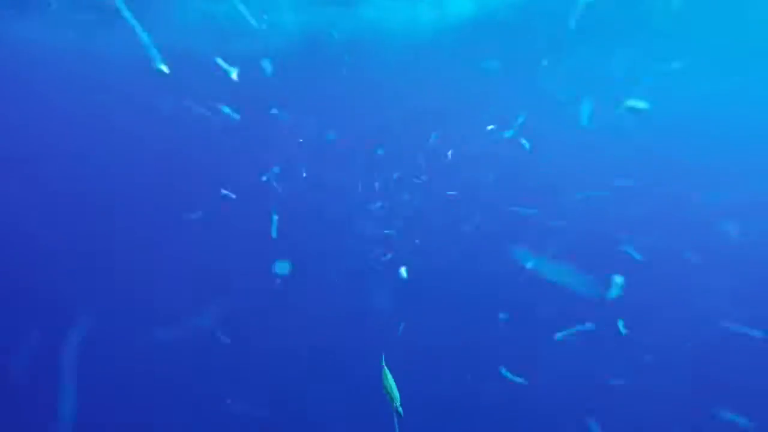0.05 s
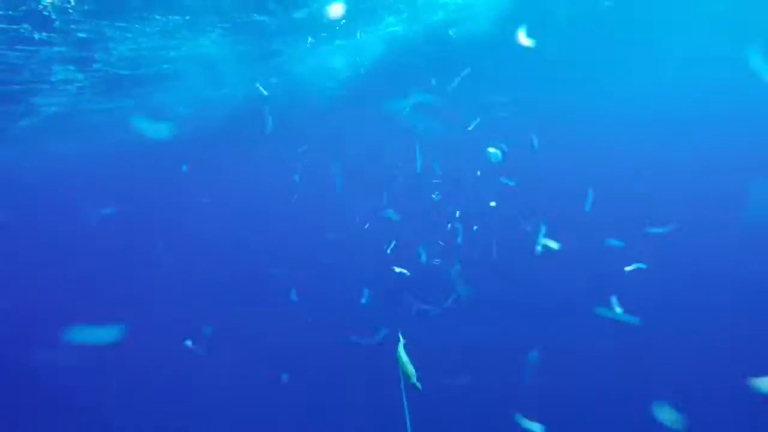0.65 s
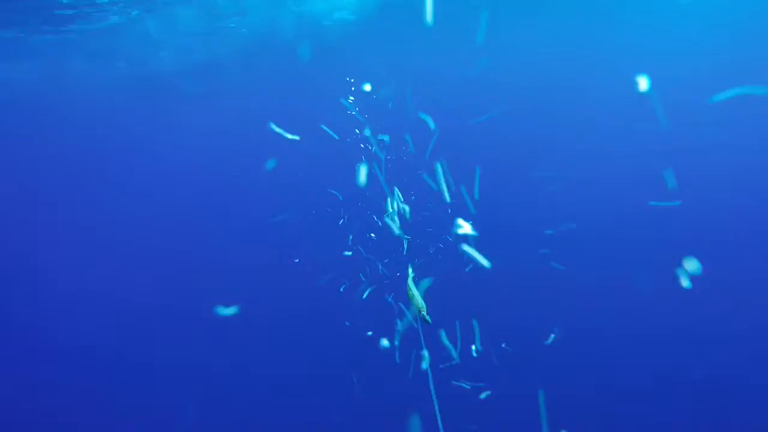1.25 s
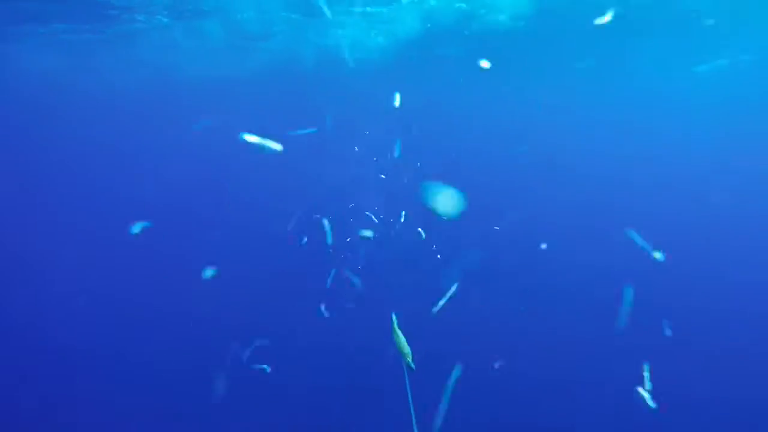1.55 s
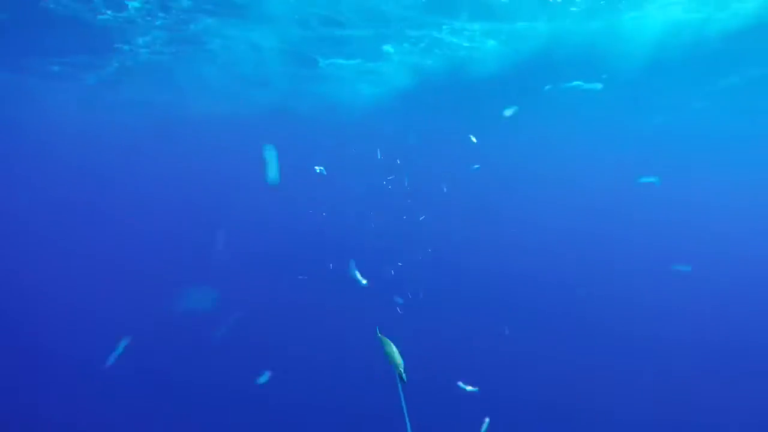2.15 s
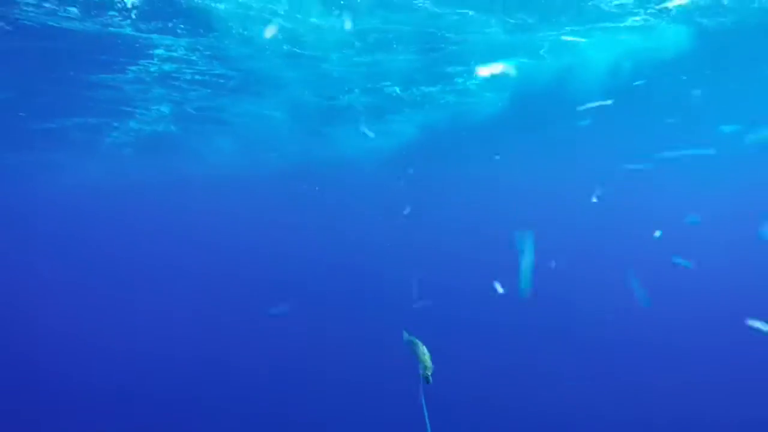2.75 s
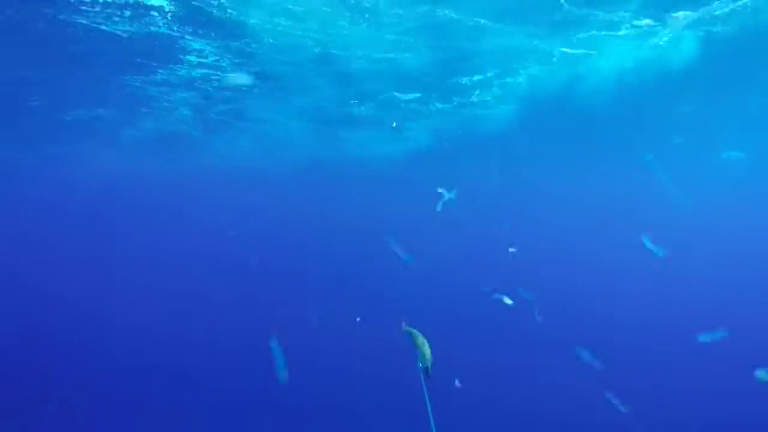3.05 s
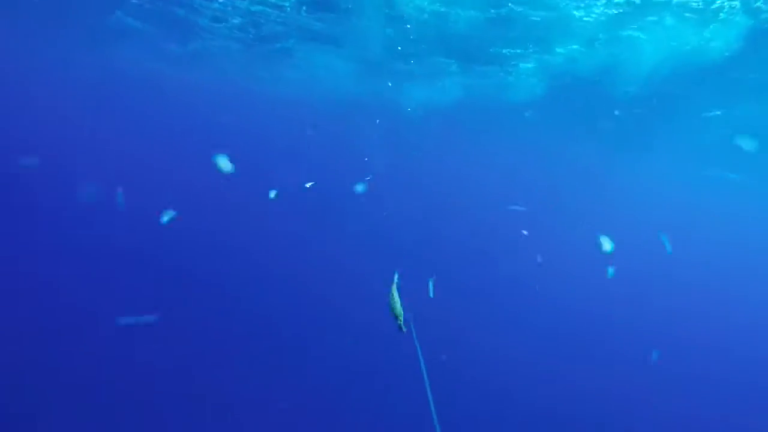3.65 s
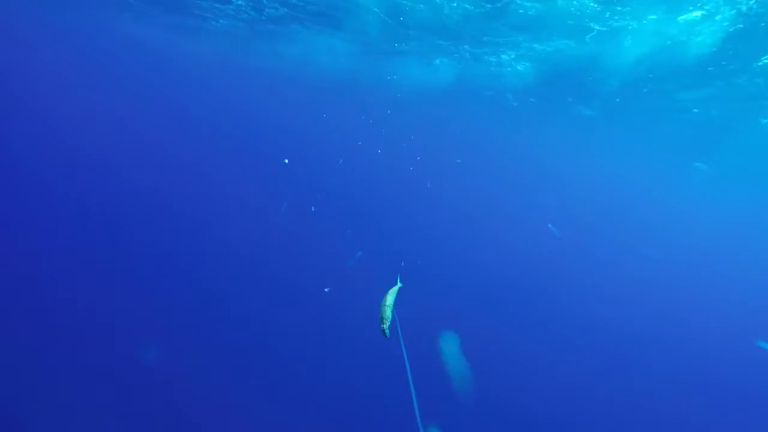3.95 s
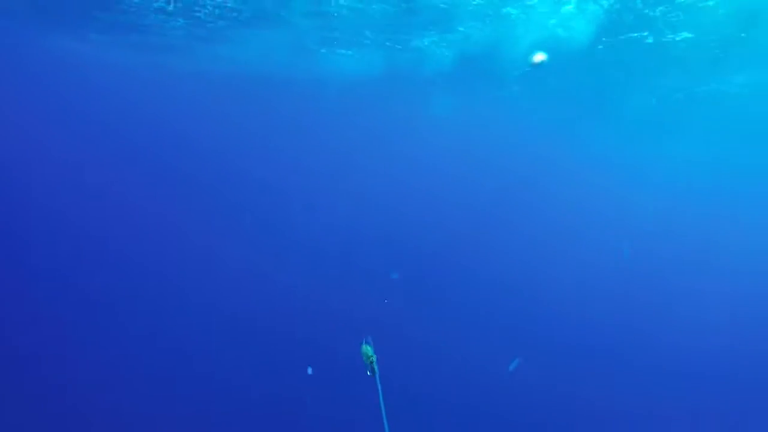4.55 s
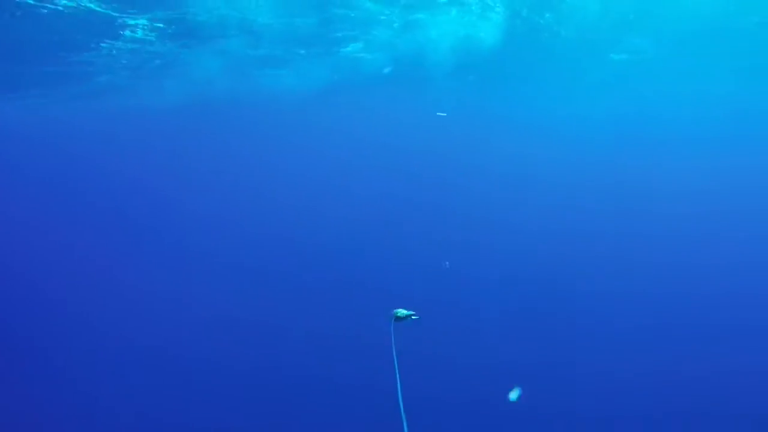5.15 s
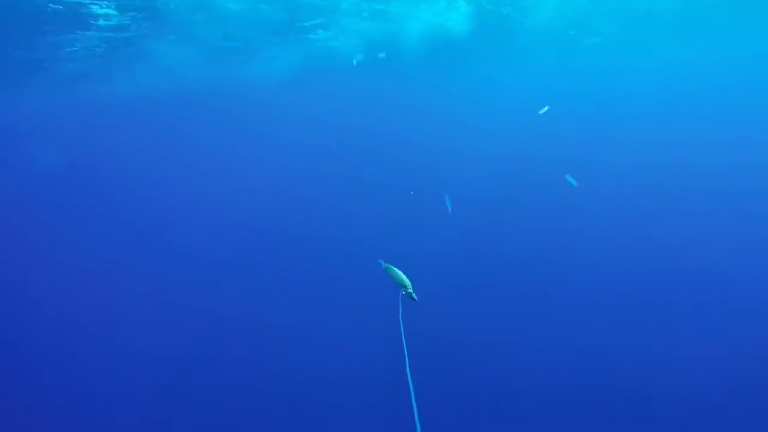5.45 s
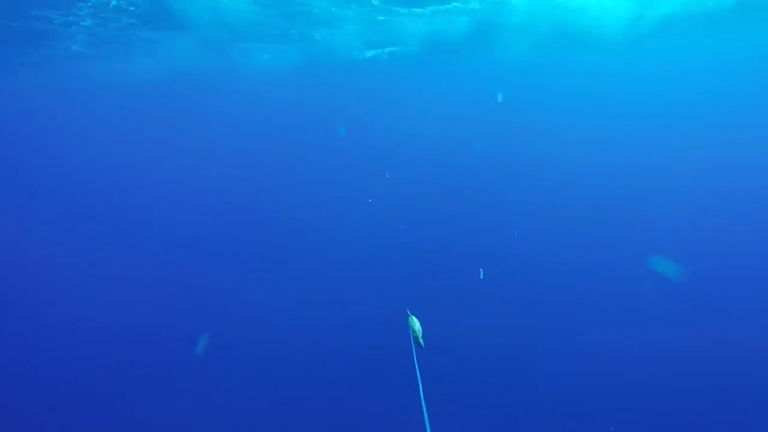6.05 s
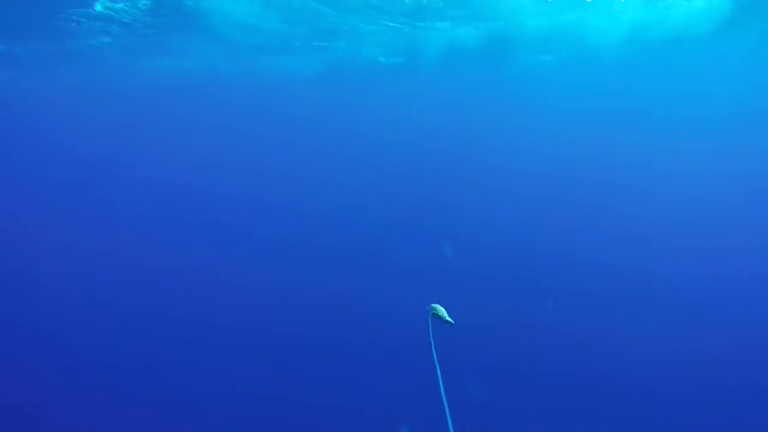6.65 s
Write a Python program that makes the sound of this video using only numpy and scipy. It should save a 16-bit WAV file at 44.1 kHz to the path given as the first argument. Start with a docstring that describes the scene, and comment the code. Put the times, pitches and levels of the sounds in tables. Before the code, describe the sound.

Bubbles crackle and water rushes past a towed underwater camera while its line throbs, shakes metal fittings and buzzes over faint engine hum.

```python
"""An underwater camera is towed behind a boat, a lure trailing after it. From the start, vortices make the
tow line strum and slap the mount, wake bubbles crackle and ring, water rushes by and the engine hums.
The strum swells near 0.5 s, its modes beating; near 2 s the hardest slaps make the mount zing.
From 3 s the wide swing rattles a shackle, then from 4.7 s buzzes a taut wire. After 5.3 s the strum
subsides, and a last flurry of bubbles passes just before 7 s."""
import sys
import numpy as np
from scipy import signal
from scipy.fft import rfft, irfft, next_fast_len
from scipy.io import wavfile
from scipy.ndimage import uniform_filter1d

SR = 44100
rng = np.random.default_rng(int(sys.argv[2]) if len(sys.argv) > 2 else 0)


def unload_wav(signal):
    """Save mono or channel-first audio to the path in sys.argv[1] as 16-bit WAV at rate SR, clipped to [-1, 1]."""
    wavfile.write(
        sys.argv[1],
        SR,
        np.round(np.clip(np.atleast_2d(signal).T, -1, 1) * 32767).astype(np.int16),
    )


N = 304731
TIME = np.arange(N) / SR

# strength of the wake: time_s, rumble_db, rush_db, crackle_db
WAKE_LEVELS = [(0, -30.5, -34.5, -33.5), (.2, -41.5, -40.5, -38.5), (.24, -33, -39, -29),
               (.35, -39, -36.5, -27.5), (.65, -36, -38.5, -30.5), (1.0, -49, -44.5, -40.5),
               (1.3, -39, -42.5, -39), (1.7, -39, -39, -32.5), (2.1, -44, -37.5, -37),
               (2.6, -47, -41.5, -40.5), (3.05, -41.5, -45.5, -38), (3.5, -53.5, -45.5, -40.5),
               (4.4, -53.5, -50.5, -41.5), (5.3, -53.5, -55, -48), (5.8, -51, -51, -42.5),
               (6.3, -52, -49.5, -43.5), (6.72, -53, -50.5, -50), (6.91, -47, -46, -33.5)]
# resonances of the camera housing: pitch_hz, width_hz, level_db
HOUSING_MODES = [(673.6, 20, -5), (857.6, 27, -3), (932, 57, -9.5), (1123, 50, -11), (1215, 35, -2),
                 (1564, 59, -6.5), (1689, 33, -10), (1719, 44, -4), (1804.4, 46, 1.5), (2202, 256, -13),
                 (2700, 140, -33), (3123, 92, -18), (3358, 97, -15.5), (3652, 56, -12), (4174, 180, -17),
                 (5660, 490, -17.5), (7800, 460, -23.5)]
# spells of a shaken fitting: start_s, end_s, attack_s, release_s, level_db, treble_db, loosening_swing_db
SHACKLE_SHAKES = [(3.032, 3.964, 0.56, .015, -33.5, -5.5, -23.5),
                  (3.996, 4.696, 0.023, 0.022, -37.5, -3, -28)]
WIRE_SHAKES = [(4.679, 4.967, 0.045, 0.029, -33.5, -4, -20), (4.969, 5.138, 0.077, 0.016, -37, -4, -20.5),
               (5.131, 5.292, 0.035, .11, -36.5, -2.5, -19.5)]


def undb(db):
    """Decibels to amplitude ratio."""
    return 10 ** (np.asarray(db) / 20)


def unit(x):
    """Normalisation to rms 1."""
    return x / np.sqrt(np.mean(x ** 2))


def steady(x, span_s=.13):
    """Division by the running rms removes slow swells and leaves the grain."""
    power = np.abs(uniform_filter1d(x ** 2, int(span_s * SR)))
    return x / np.sqrt(power + 1e-4 * np.mean(x ** 2))


def curves(table):
    """Linear interpolation of each column over time."""
    time_s, *columns = np.transpose(table)
    return [np.interp(TIME, time_s, column) for column in columns]


def walk(rate_hz):
    """Smooth random modulation with rms 1."""
    step = max(int(SR / rate_hz), 1)
    stairs = np.repeat(rng.standard_normal(N // step + 1), step)
    return unit(uniform_filter1d(stairs, step)[:N])


def spell(start_s, end_s, attack_s, release_s):
    """Trapezoidal envelope: rise, hold, fall."""
    return np.clip(np.minimum((TIME - start_s) / attack_s, (end_s - TIME) / release_s), 0, 1)


def add(out, start_s, sound):
    """Superposition of a sound at a given time."""
    i = int(np.clip(start_s * SR, 0, N - 1))
    out[i:i + len(sound)] += sound[:N - i]


def colour(x, spectrum, size=1024):
    """Minimum-phase filtering, built by folding the cepstrum of the spectrum."""
    hz, db = np.transpose(spectrum)
    bins_hz = np.maximum(np.fft.rfftfreq(size, 1 / SR), 1)
    gain = undb(np.interp(np.log(bins_hz), np.log(hz), db))
    cepstrum = irfft(np.log(gain))
    cepstrum[1:size // 2] *= 2
    cepstrum[size // 2 + 1:] = 0
    return signal.oaconvolve(x, irfft(np.exp(rfft(cepstrum))))[:N]


def ring(x, modes):
    """Modal resonance: the wider a mode, the faster it decays."""
    t = TIME[:4096]
    response = sum(undb(db) * width * np.exp(-np.pi * width * t) * np.cos(2 * np.pi * hz * t)
                   for hz, width, db in modes)
    response[0] /= 2
    return signal.oaconvolve(x, response)[:N]


def ping(hz, t60_s, rise_s, size=2048):
    """Damped oscillation with peak 1."""
    t = TIME[:size]
    envelope = np.exp(-np.log(1000) * t / t60_s) * (1 - np.exp(-t / rise_s))
    tone = envelope * np.sin(2 * np.pi * hz * t)
    return tone / np.abs(tone).max()


def taps(hz, jitter_s, scatter_db, alternate_db):
    """Impact train: one uneven contact a cycle, every second one changed by alternate_db."""
    at = np.flatnonzero(np.diff(np.floor(np.cumsum(hz) / SR)))
    late, force = rng.standard_normal((len(at), 2)).T
    force_db = np.broadcast_to(scatter_db, N)[at] * np.clip(force, -2, 2)
    force_db += alternate_db * (np.arange(len(at)) % 2)
    jittered = np.clip(at + late * jitter_s * SR, 0, N - 1).astype(int)
    return np.bincount(jittered, undb(force_db), N)


def scrape(hits, length_s):
    """Friction noise: micro-contacts die away after each hit, in proportion to its force."""
    decay = np.exp(-2 / (length_s * SR))
    energy = signal.lfilter([1 - decay], [1, -decay], hits ** 2)
    return np.sqrt(energy) * rng.standard_normal(N)


def voiced(x, level_db, treble_db):
    """Spectral balance of a contact sound: overall level and relative treble."""
    body = signal.sosfiltfilt(signal.butter(5, 2200, fs=SR, output="sos"), x)
    return undb(level_db) * (undb(-2.1) * steady(body) + undb(treble_db) * steady(x - body))


def vortex_swing(beats):
    """Vortex shedding swings the line, faster and wider as the pull grows; gives pitch and phasor."""
    # the line's first mode: time_s, pitch_hz, level_db
    first_mode = [(0, 121.2, -40), (.2, 120.3, -45), (.32, 128.9, -29.5), (.46, 144, -15.5),
                  (.6, 151.4, -18.5), (.85, 129.2, -28), (1.0, 118, -49.5), (1.4, 105.9, -38),
                  (2.45, 101, -40.5), (2.65, 123.8, -25.5), (3.0, 144.7, -17.5), (3.37, 141.2, -16),
                  (3.62, 124.3, -24.5), (3.93, 127.1, -15.5), (4.62, 119, -21), (4.77, 119.5, -24),
                  (5.19, 129.5, -17.5), (5.6, 111.4, -38), (6.03, 95, -34.5), (6.35, 99.93, -26.5),
                  (6.55, 99.6, -38.5), (6.91, 114.9, -48)]
    hz, level_db = curves(first_mode)
    amplitude = undb(level_db + 1.5 + .83 * walk(23))
    return hz, amplitude * beats * np.exp(2j * np.pi * np.cumsum(hz) / SR)


def strum(swing):
    """Nonlinear contact roughens the line's almost sinusoidal swing."""
    # the line's broad flutter: frequency_hz, gain_db
    flutter_spectrum = [(50, -28.5), (95, 1), (130, 3.5), (160, -1), (200, -12.5), (250, -13.5),
                        (320, -40.5), (600, -55.5)]
    amplitude, phase = np.abs(swing), np.unwrap(np.angle(swing))
    # contact flattens one side of the swing, which adds the octave above
    overtone = undb(-36) * amplitude * np.cos(2 * phase) * (1 + .5 * walk(40))
    fundamental = swing.real * (1 + .14 * walk(41))
    # alternate swings differ while a fitting rattles, which adds the octave below
    rattling = sum(spell(*row[:4]) for row in SHACKLE_SHAKES + WIRE_SHAKES)
    undertone = undb(-29.5) * rattling * amplitude * np.cos(phase / 2)
    flutter = undb(-39.5) * unit(colour(rng.standard_normal(N), flutter_spectrum, size=4096))
    return fundamental + overtone + undertone + flutter


def disperse(x, spread_s):
    """Dispersion of bending waves: the treble arrives first, so an impact becomes a falling chirp."""
    size = next_fast_len(N + SR // 10)
    khz = np.fft.rfftfreq(size, 1 / SR) / 1000
    phase_lag = 4 * np.pi * 1000 * spread_s * np.sqrt(khz)
    return irfft(rfft(x, size) * np.exp(-1j * phase_lag), size)[:N]


def slaps():
    """Impact excitation: the line slaps the mount, and the dispersed blows ring the housing."""
    # the line's blows: time_s, rate_hz, level_db, treble_db
    blows = [(0, 100.3, -42.5, -9), (.75, 100.1, -38, -14.5), (1.0, 96.1, -49.5, -6),
             (1.12, 98.1, -33.5, -17), (1.35, 100.3, -33, -11), (1.7, 104.8, -29, -7.5),
             (2.15, 108.6, -29.5, -10.5), (2.3, 97.8, -36, -21.5), (2.62, 101.3, -31.5, -12.5),
             (2.72, 90.44, -46.5, -26), (3.04, 67.55, -38.5, -15), (3.1, 62.46, -35, -6.5),
             (3.33, 63, -35.5, -10), (3.45, 86.8, -43, -7.5), (3.9, 104.1, -38, -5.5),
             (4.7, 110.9, -50, -7.5), (5.4, 70.15, -54.5, -11.5), (6.7, 65.72, -50, -35),
             (6.91, 65.13, -47, -16)]
    # timbre of a slap: frequency_hz, gain_db
    slap_spectrum = [(120, -22.5), (300, -6), (800, -8), (1300, 6.5), (1900, 4), (2900, -2.5), (3700, 4),
                     (4500, -4.5), (5000, -6.5), (5700, -18), (6900, -21.5), (9000, -33), (15000, -36.5)]
    rate_hz, level_db, treble_db = curves(blows)
    scatter_db = np.interp(rate_hz, [68, 102], [3.6, 2.6])  # a slack, slow line strikes less evenly
    hits = taps(rate_hz * (1 + .03 * walk(14)), jitter_s=.0004, scatter_db=scatter_db, alternate_db=2.5)
    chirps = disperse(hits + undb(-4.5) * scrape(hits, length_s=.002), spread_s=.0036)
    knocks = steady(colour(ring(chirps, HOUSING_MODES), slap_spectrum))
    return voiced(knocks + zing(chirps), level_db + walk(9), treble_db)


def crackle(per_second=520, scatter_db=6):
    """Shot noise: many small bubbles and a few large ones strike the housing at random."""
    # timbre of the strikes: frequency_hz, gain_db
    strike_spectrum = [(120, -19), (300, -14), (850, 4.5), (1300, 3), (1900, -0.5), (3000, 3.5), (4500, 0),
                       (5200, -12.5), (7000, -18), (15000, -32)]
    chance, size, sign = rng.random((3, N))
    force = undb(scatter_db * np.minimum(-np.log(1 - size), 4.2))
    hits = (chance < per_second / SR) * force * np.sign(sign - .5)
    drive = hits + undb(-2.5) * scrape(hits, length_s=.0049)
    return steady(colour(ring(drive, HOUSING_MODES), strike_spectrum))


def gurgle(count=1400, low_hz=760, high_hz=2100, cycles=16, scatter_db=14):
    """Minnaert resonance: free bubbles ring at the pitch of their size, mostly through the housing."""
    out = np.zeros(N)
    for when, smallness, weakness in rng.random((count, 3)):
        hz = low_hz * (high_hz / low_hz) ** smallness
        tone = ping(hz, t60_s=cycles / hz, rise_s=.0004, size=1024)
        add(out, when * N / SR, undb(-scatter_db * weakness) * tone)
    return steady(unit(ring(out, HOUSING_MODES)) + undb(-9.5) * unit(out))


def wake_bubbles():
    """Common modulation: the wake's crackle and gurgle come in the same patches; the treble flickers."""
    level_db = curves(WAKE_LEVELS)[2] + 2.5 * walk(17)
    treble_db = -14 + 2 * walk(35)
    return voiced(crackle(), level_db - 1.7, treble_db) + undb(level_db - 5.5) * gurgle()


def engine(firing_hz=40.6):
    """Periodic firing gives a tone and a weak harmonic, which waver on their way through the water."""
    # engine hum: time_s, level_db
    hum_levels = [(0, -41), (1.1, -45.5), (1.4, -36), (2.5, -30.5), (3.2, -42), (3.6, -39), (4.3, -48.5),
                  (5.9, -49), (6.91, -39)]
    phase = 2 * np.pi * np.cumsum(firing_hz * (1 + .0264 * walk(7))) / SR
    level_db = curves(hum_levels)[0] + 2 * walk(11)
    return undb(level_db) * unit(np.sin(phase) + undb(-25.5) * np.sin(2 * phase))


def sea():
    """Filtered noise: water rumble and rush, the engine's overtones droning in the rush, faint hiss."""
    # spectra of the rumble, the rush with the engine's overtones, and the hiss: frequency_hz, gain_db
    rumble_spectrum = [(10, 10), (28, 15.5), (42, 9.5), (55, -1.5), (80, 3), (130, -32.5), (300, -57.5)]
    rush_spectrum = [(60, 0), (150, 5.5), (200, 2), (245, 6.5), (280, -5), (320, 6.5), (365, -2.5),
                     (400, -1.5), (470, 0.5), (590, -8), (800, -7), (1400, -16), (4000, -35), (8000, -59.5)]
    hiss_spectrum = [(300, 1), (3000, 20), (6000, 0), (9000, 0), (12000, -3), (15500, -17)]
    rumble_db, rush_db, _ = curves(WAKE_LEVELS)
    low, middle, high = rng.standard_normal((3, N))
    rumble = undb(rumble_db + 3) * steady(colour(low, rumble_spectrum, size=16384), span_s=.33)
    rush = undb(rush_db + 1.5 + 2.24 * walk(30)) * unit(colour(middle, rush_spectrum, size=4096))
    return rumble + rush + undb(-62.5) * unit(colour(high, hiss_spectrum))


def swarms(count=24, low_hz=2300, high_hz=5600):
    """Minnaert resonance in clouds of free bubbles: smaller ones ring higher and fainter."""
    # clouds drifting past: centre_s, half_length_s, level_db
    clouds = [(0.046, 0.045, -46.5), (0.244, 0.044, -47), (0.931, 0.038, -46.5), (1.097, 0.042, -47),
              (1.295, 0.04, -38.5), (6.872, .02, -47.5)]
    out = np.zeros(N)
    for centre_s, half_s, db in clouds:
        for when, smallness, weakness in rng.random((count, 3)):
            hz = low_hz * (high_hz / low_hz) ** smallness
            gain = undb(db + 17 - 14 * weakness - 7 * smallness)
            add(out, centre_s + half_s * (2 * when - 1), gain * ping(hz, t60_s=24 / hz, rise_s=.0002))
    return out


def ticks():
    """Heavy damping: tiny bubbles on the lens ring so briefly that they only tick."""
    # tiny bubbles: start_s, level_db, pitch_hz, top_db
    tiny_bubbles = [(0.0236, -29.5, 5040, -11), (0.0354, -34, 5680, -12), (0.0646, -35, 6200, -11),
                    (0.173, -43, 5180, -6), (0.202, -39, 8450, -12), (0.2144, -25, 5370, -24),
                    (0.2325, -29, 5760, -12), (0.2444, -38, 5040, -11), (0.3164, -38, 5470, -3),
                    (0.3238, -28.5, 5270, -21), (0.335, -32, 5000, -13), (0.5486, -31.5, 5100, -17),
                    (0.5787, -31, 5490, -35), (0.838, -30, 11750, -19), (1.04, -34, 5950, -11),
                    (1.063, -33, 5030, -23), (1.1054, -29, 5130, -19), (1.1843, -20, 4400, -29),
                    (1.279, -36, 5138, -15), (1.294, -35, 5150, -13), (1.323, -34, 5120, -5),
                    (1.3318, -27.5, 5590, -14), (1.382, -38, 8460, -16), (1.4885, -29, 5100, -22),
                    (1.5229, -21.5, 5285, -29), (2.362, -31.5, 6650, -4.5), (2.4861, -34, 5696, -7),
                    (2.6341, -27, 5740, -12.5), (2.9776, -31, 6855, -7), (6.859, -29, 4355, -28)]
    out = np.zeros(N)
    for start_s, db, hz, top_db in tiny_bubbles:
        tone = ping(hz, t60_s=.0055, rise_s=.0001)
        top = undb(top_db + 4.5) * ping(10300, t60_s=.001, rise_s=.00014)
        add(out, start_s + .00111, undb(db - 2.5) * (tone + top))
    return out


def plinks():
    """Free oscillation: a film tears with a crack, and the new bubble rings clearly."""
    # free bubbles: start_s, level_db, pitch_hz
    free_bubbles = [(0.0643, -32, 3660), (0.1463, -29, 3700), (0.227, -25.5, 3760), (0.839, -29, 3650),
                    (0.9331, -31.5, 3320), (0.9535, -31, 2220), (1.03, -42, 4890), (1.059, -27.5, 2910),
                    (1.066, -28.5, 3890), (1.0995, -26, 3900), (1.2793, -20, 2620), (1.2828, -26, 2600),
                    (1.3144, -33, 2580), (2.97, -29.5, 3284), (2.9836, -26, 2640), (3.1115, -32, 2070),
                    (3.1342, -31, 2226), (6.111, -32.5, 2070)]
    crack_band = signal.butter(4, [2000, 5200], "bandpass", fs=SR, output="sos")
    out = np.zeros(N)
    for start_s, db, hz in free_bubbles:
        tear = rng.standard_normal(2048) * ping(hz, t60_s=.022, rise_s=.000079)
        crack = undb(1) * signal.sosfilt(crack_band, tear)
        tone = ping(hz, t60_s=.024, rise_s=.00017)
        add(out, start_s + .0006, undb(db + 2) * (tone + crack))
    return out


def pops():
    """Impulse response: larger bubbles burst on the housing, which rings briefly with them."""
    # bursting bubbles: start_s, level_db, pitch_hz, treble_db
    bursts = [(0.109, -2.5, 1700, -6.5), (0.238, -16, 1130, -24), (0.244, -11, 1760, -19),
              (0.447, -9, 1730, -28), (0.578, -17, 1670, -16), (0.626, -12.5, 1870, -18),
              (0.79, -15, 1750, -27), (0.809, -16.5, 1761, -11.5), (0.859, -25, 1790, -20),
              (0.913, -16, 1740, -22), (1.084, -13.5, 1700, -34), (1.25, -9.5, 2300, -12),
              (1.587, -12.5, 1745, -29), (1.712, -9, 1820, -30), (2.02, -16.5, 1757, -29),
              (2.196, -12.5, 1706, -18), (2.314, -15, 1750, -28.5), (2.358, -20, 1784, -36),
              (2.484, -16, 1660, -33), (2.513, -17.5, 1750, -21), (2.642, -10.5, 1619, -23),
              (2.726, -20.5, 1790, -28), (2.774, -23.5, 1790, -38), (2.809, -17.5, 1780, -28),
              (2.904, -26, 1697, -15), (2.924, -21.5, 1790, -21), (3.094, -20, 1850, -11),
              (3.257, -14, 1838, -16.5), (5.486, -19.5, 840.9, -33), (5.616, -27.5, 844.4, -30),
              (5.81, -25, 1574, -21.5), (6.017, -28, 880, -40), (6.111, -27, 1790, -31),
              (6.309, -32.5, 850, -19), (6.355, -36, 1245, -22), (6.808, -21.5, 1739, -35),
              (6.862, -21.5, 1733, -19)]
    out = np.zeros(N)
    for start_s, db, hz, treble_db in bursts:
        tone = ping(hz, t60_s=32 / hz, rise_s=.00055)
        high_mode = undb(treble_db + 10.5) * ping(3595, t60_s=.0066, rise_s=.00067)
        low_mode = undb(-12) * ping(1746, t60_s=.035, rise_s=.0015)
        add(out, start_s + .00053, undb(db - 5.5) * (tone + high_mode + low_mode))
    return out


def beating(fade_s=.04):
    """Interference: other modes of the line reinforce and cancel the first at the difference frequency."""
    # modes relative to the first: start_s, length_s, offset_hz, level_db
    other_modes = [(.412, .41, -12.2, -6.5), (2.73, .22, -18.8, -4), (3.015, .69, -15.6, -9),
                   (2.91, 1.1, 7.3, -12), (3.758, .35, 13.8, -3), (4.748, .25, 4.5, -9),
                   (5.127, .07, 10, -6), (5.227, .31, 16.2, -4.5)]
    out = np.ones(N, complex)
    for start_s, length_s, offset_hz, db in other_modes:
        share = undb(db) * spell(start_s - fade_s, start_s + length_s + fade_s, fade_s, fade_s)
        rotation = np.exp(2j * np.pi * offset_hz * (TIME - start_s))
        out *= (1 - share * rotation) / np.sqrt(1 + share ** 2)
    return out


def zing(chirps):
    """Resonance: the mount rings in a high band during the spell of hardest slaps."""
    band = signal.butter(3, [7300, 8400], "bandpass", fs=SR, output="sos")
    envelope = spell(1.45, 2.414, attack_s=.62, release_s=.15)
    return undb(-36.5) * envelope * unit(signal.sosfilt(band, chirps))


def rattle(hz, modes, modes_db, alternate_db):
    """Period doubling: the strum jerks a metal fitting once a swing, strong and weak by turns."""
    # timbre of metal contact: frequency_hz, gain_db
    rattle_spectrum = [(300, -19), (900, 1), (1800, 11.5), (4600, 3.5), (5300, -9), (5700, -19.5),
                       (7000, -19.5), (10000, -43), (15000, -38.5)]
    hits = taps(hz, jitter_s=.00008, scatter_db=1.5, alternate_db=alternate_db)
    drive = hits + undb(-5) * scrape(hits, length_s=.0025)
    ringing = unit(ring(drive, HOUSING_MODES)) + undb(modes_db) * unit(ring(drive, modes))
    return steady(colour(ringing, rattle_spectrum))


def shaken(sound, swing, shakes, knee_db=2.5):
    """Contact threshold: in each spell a fitting sounds as the swing grows enough to unseat it."""
    swing_db = 20 * np.log10(np.abs(swing) + 1e-9)
    out = np.zeros(N)
    for *timing, level_db, treble_db, loosening_db in shakes:
        looseness = .5 + .5 * np.tanh((swing_db - loosening_db) / (2 * knee_db))
        out += spell(*timing) * looseness * voiced(sound, level_db, treble_db)
    return out


def shackle(hz, swing):
    """Forced vibration: the loose shackle rattles in step with the strum."""
    # resonances of the shackle: pitch_hz, width_hz, level_db
    shackle_modes = [(1970, 41, -5), (2460, 76, 0), (2650, 66, -1.5), (3040, 24, 1.5), (3080, 73, -3),
                     (3970, 300, -14.5), (4580, 240, -35), (5130, 48, -1.5), (5740, 200, -29)]
    return shaken(rattle(hz, shackle_modes, modes_db=-7.5, alternate_db=-10.5), swing, SHACKLE_SHAKES)


def wire(hz, swing):
    """Forced vibration: the strum's jerks make the taut wire buzz in its own modes."""
    # resonances of the wire: pitch_hz, width_hz, level_db
    wire_modes = [(1825, 13, 7), (2010, 68, -9.5), (2650, 140, -5), (3120, 77, -1), (3416, 69, -4),
                  (4500, 170, -36), (5050, 92, -5), (5230, 110, -23)]
    return shaken(rattle(hz, wire_modes, modes_db=4.5, alternate_db=-13.5), swing, WIRE_SHAKES)


def scene():
    """Superposition at the microphone inside the housing; the slaps swell and fade with the beats."""
    beats = beating()
    hz, swing = vortex_swing(beats)
    line = strum(swing) + np.abs(beats) * slaps() + shackle(hz, swing) + wire(hz, swing)
    bubbles = wake_bubbles() + ticks() + plinks() + pops() + swarms()
    return (line + bubbles + engine() + sea())[None]


def record(dry):
    """Soft saturation and band limiting: the camera rounds the loudest peak and cuts the top."""
    rounded = dry / (1 + dry ** 8) ** (1 / 8)
    return signal.sosfilt(signal.ellip(8, .2, 70, 15400, fs=SR, output="sos"), rounded)


dry = scene()
out = record(dry)
unload_wav(out)
```